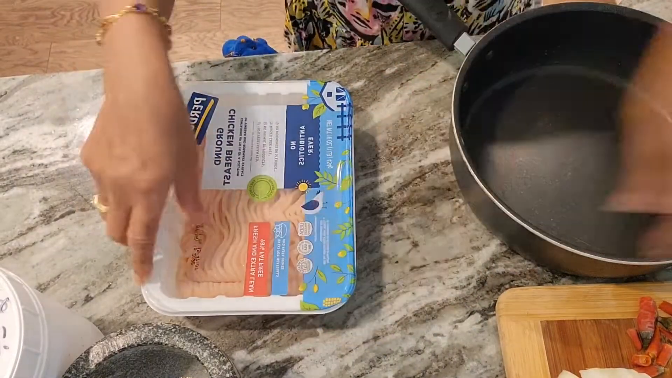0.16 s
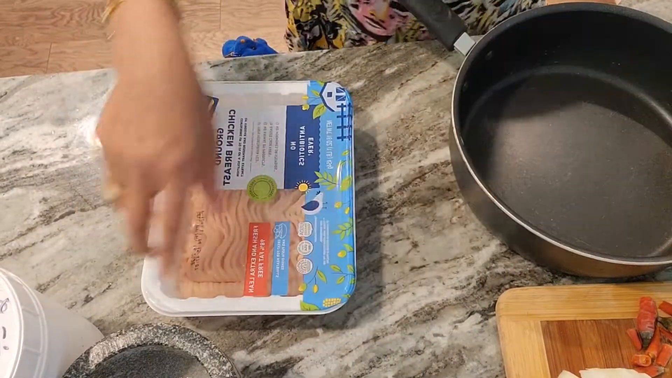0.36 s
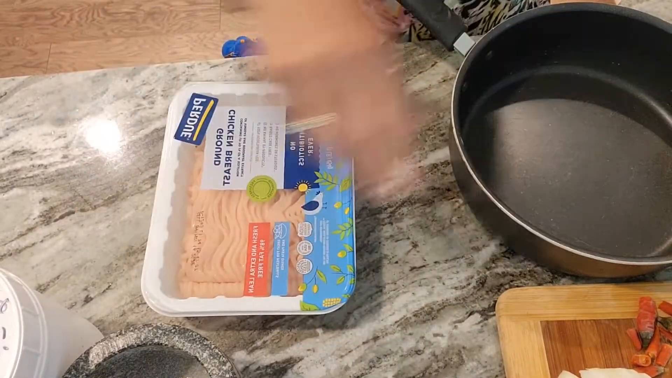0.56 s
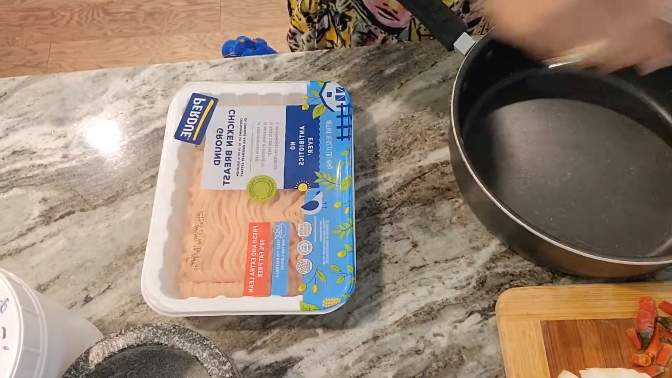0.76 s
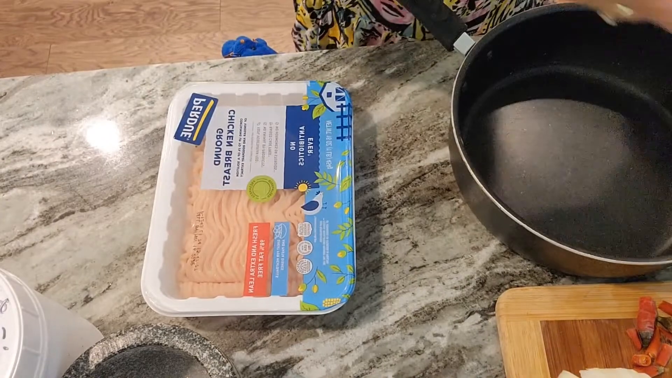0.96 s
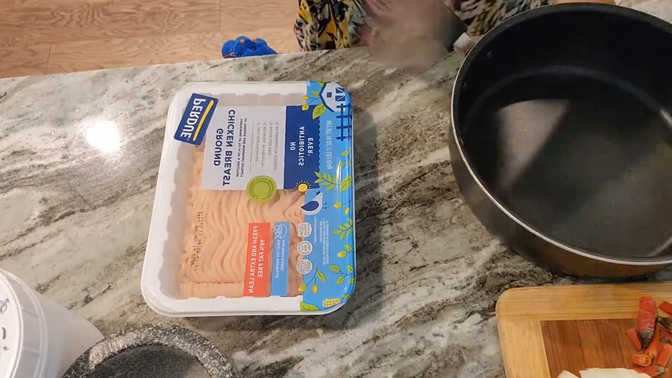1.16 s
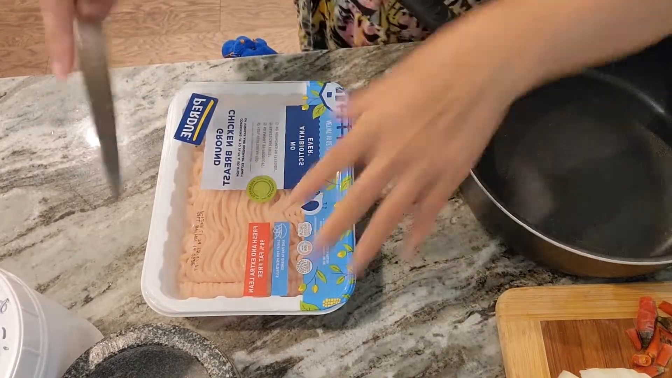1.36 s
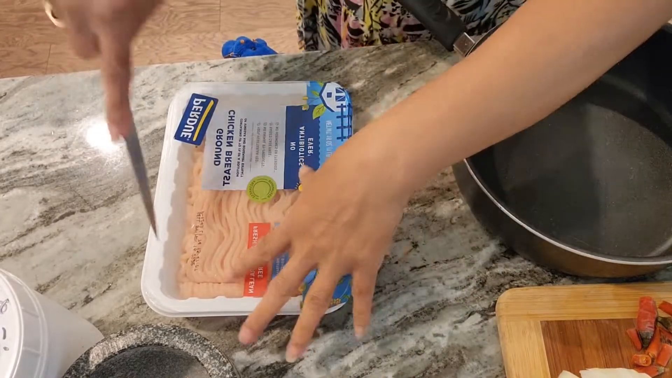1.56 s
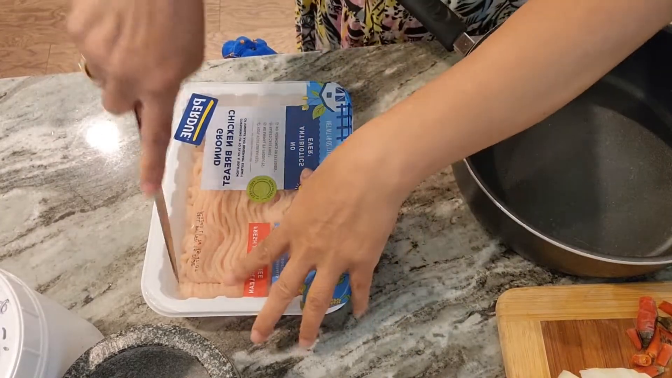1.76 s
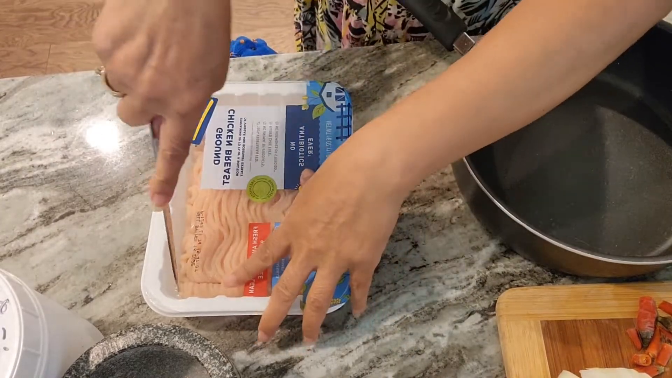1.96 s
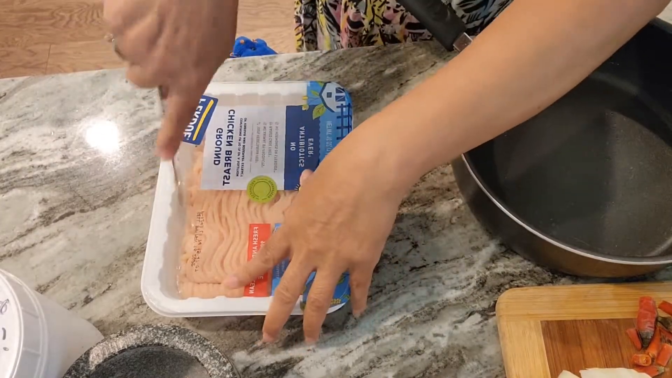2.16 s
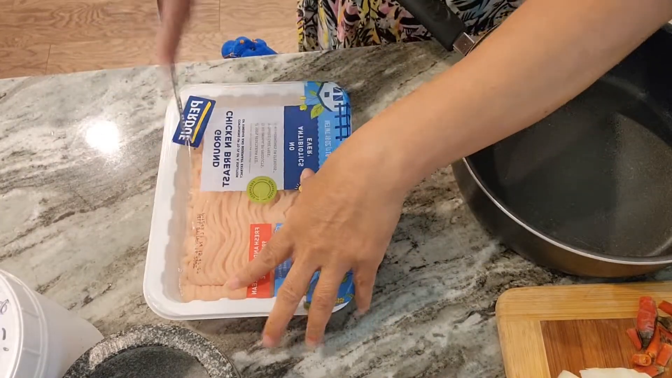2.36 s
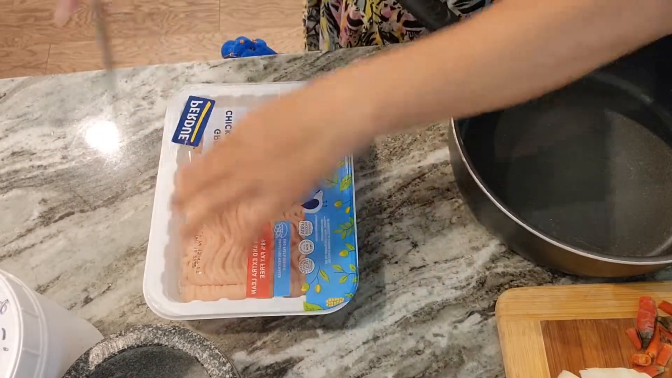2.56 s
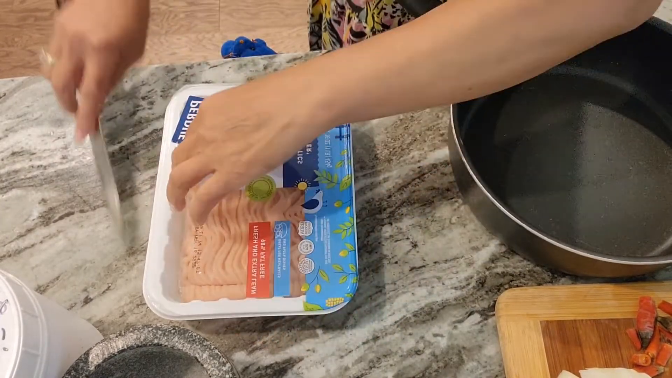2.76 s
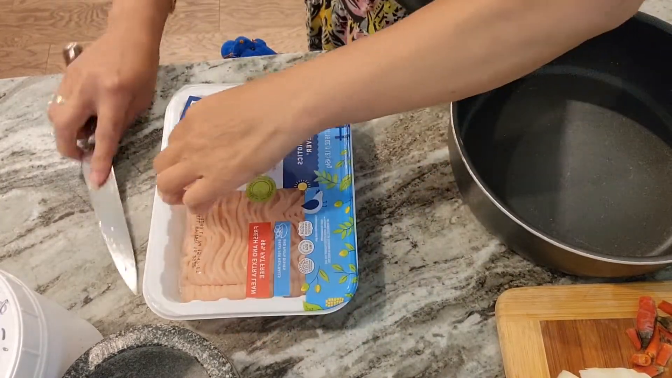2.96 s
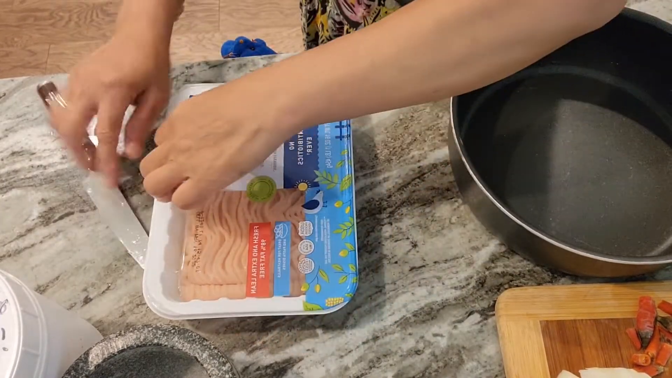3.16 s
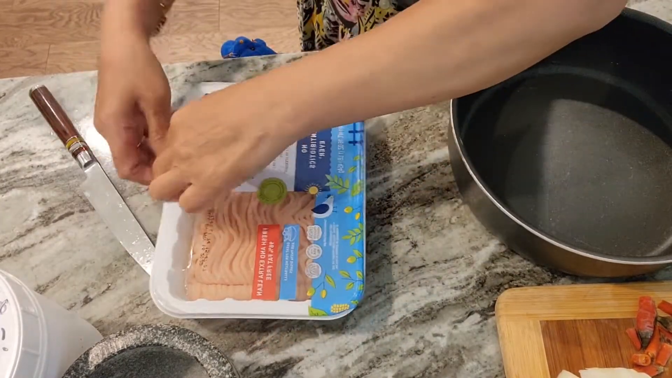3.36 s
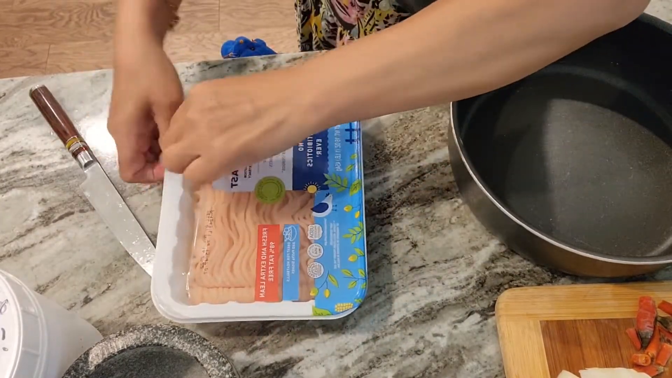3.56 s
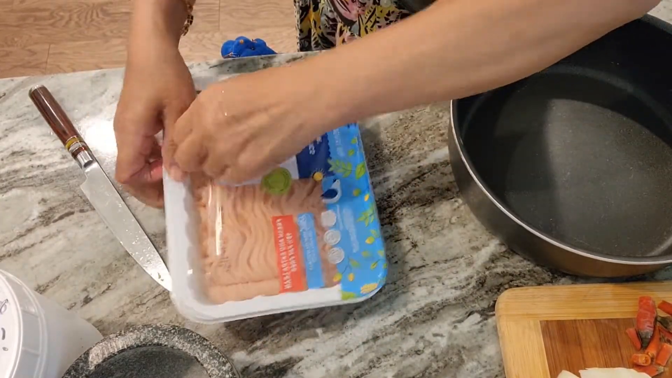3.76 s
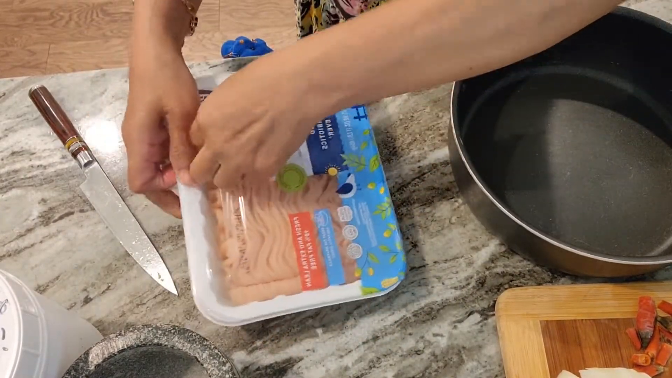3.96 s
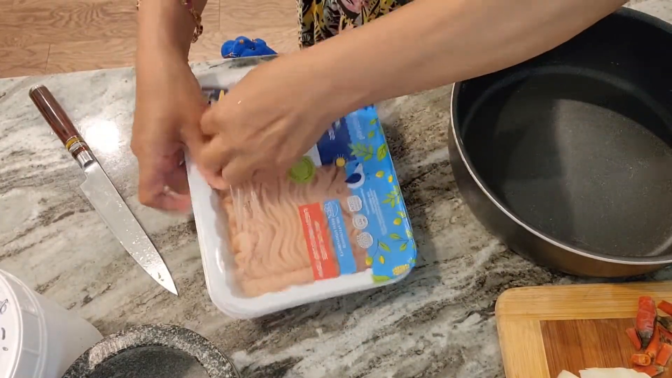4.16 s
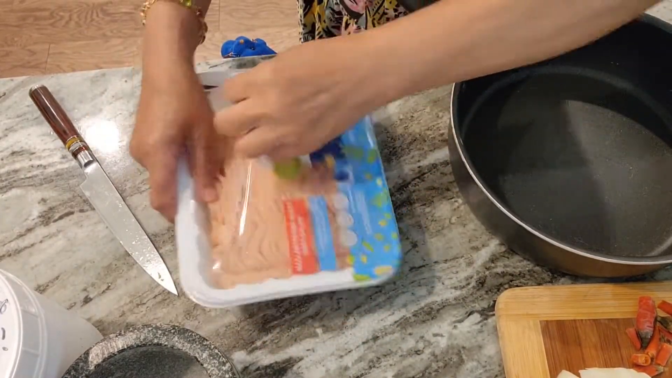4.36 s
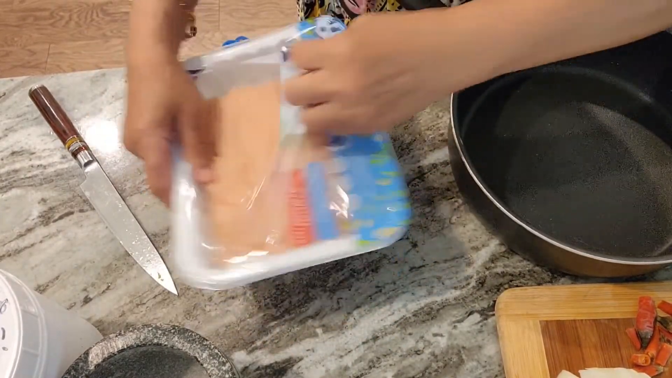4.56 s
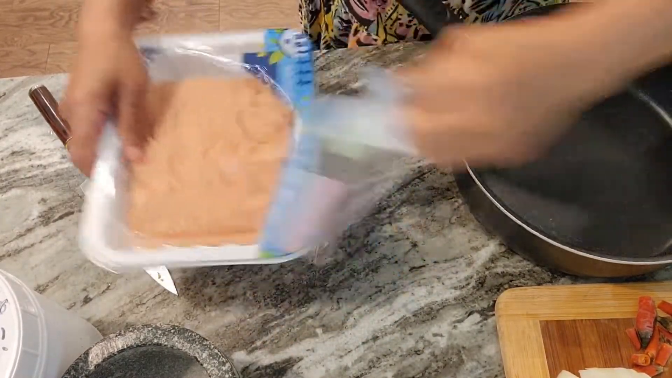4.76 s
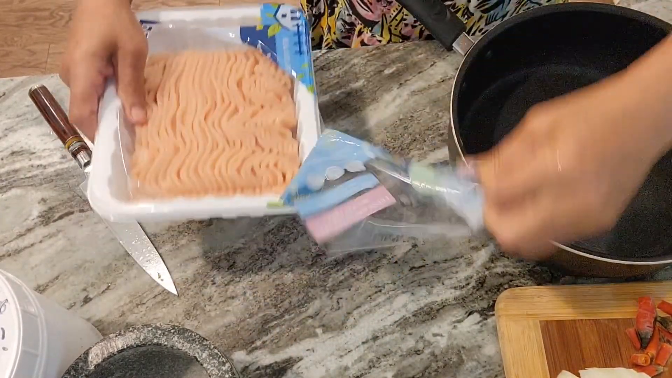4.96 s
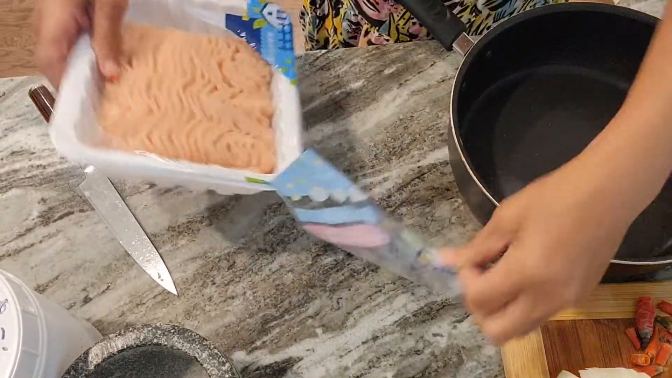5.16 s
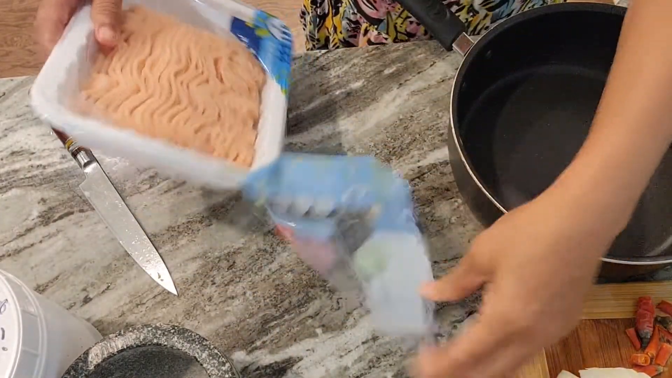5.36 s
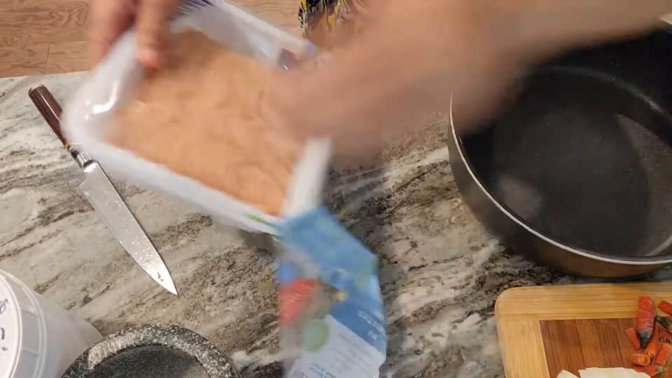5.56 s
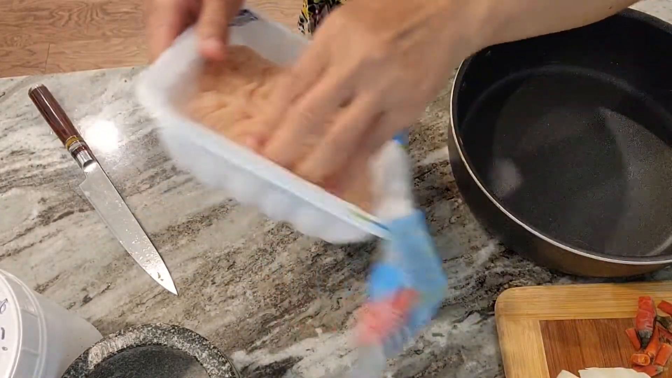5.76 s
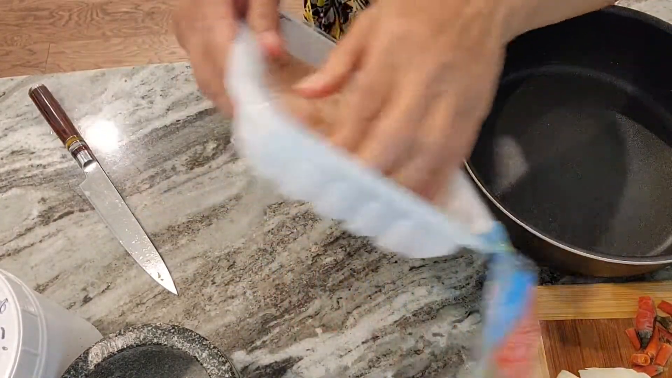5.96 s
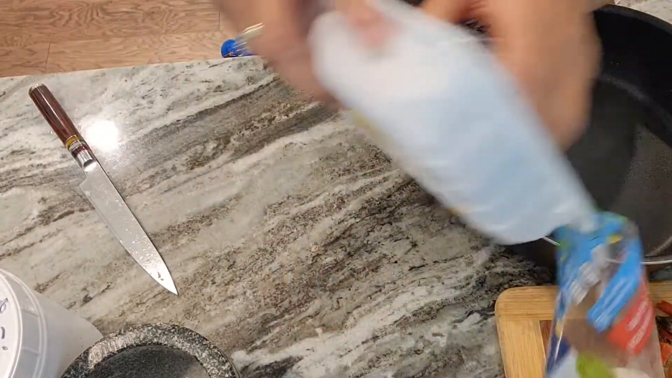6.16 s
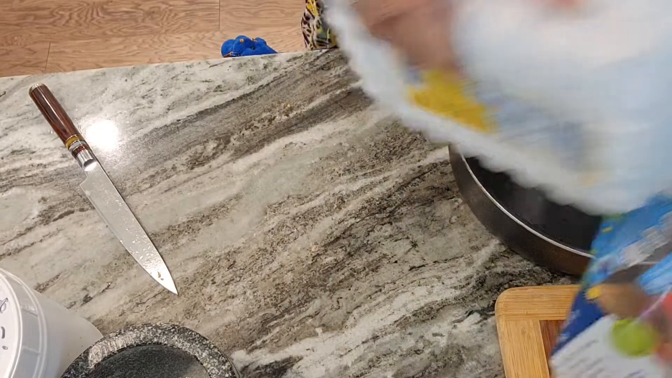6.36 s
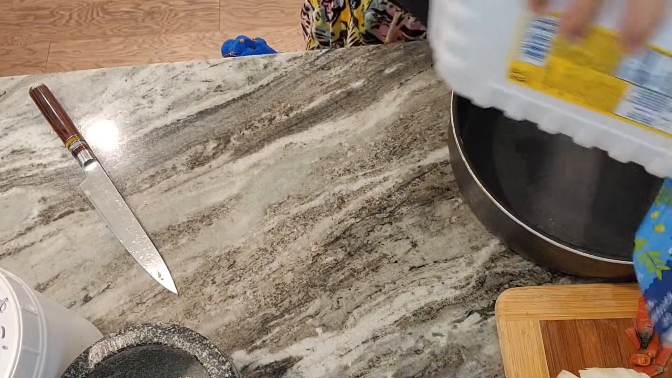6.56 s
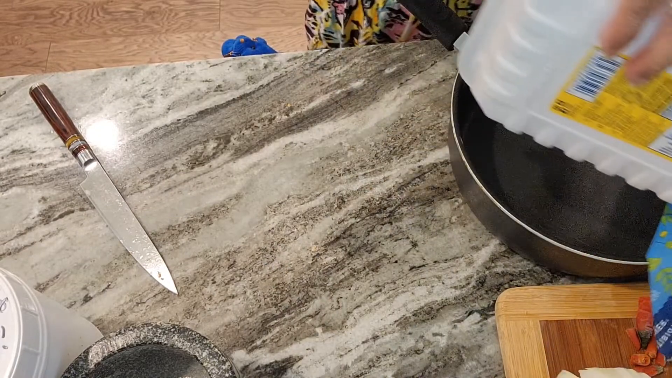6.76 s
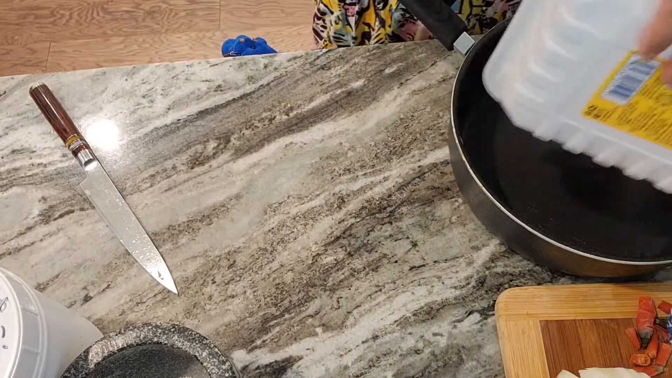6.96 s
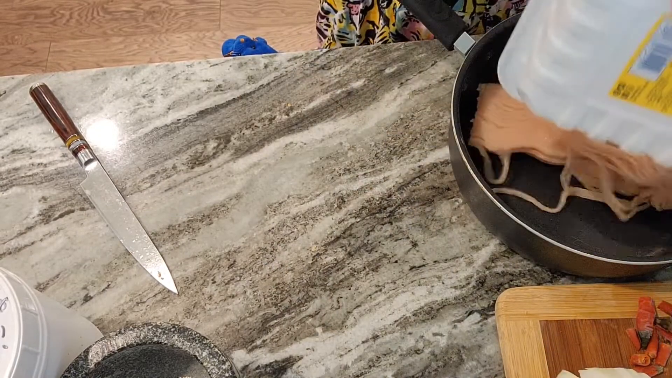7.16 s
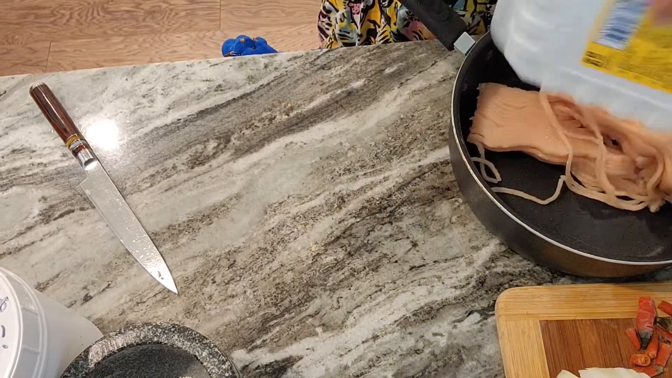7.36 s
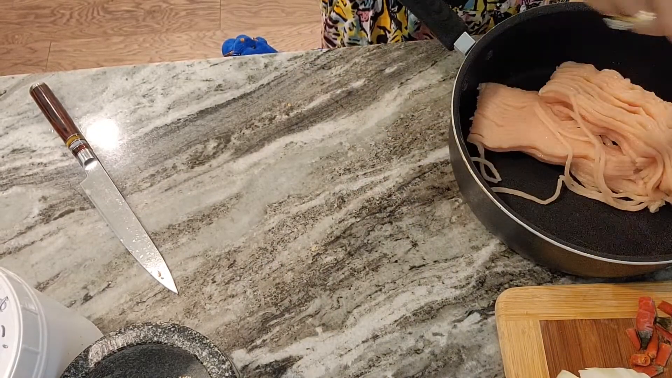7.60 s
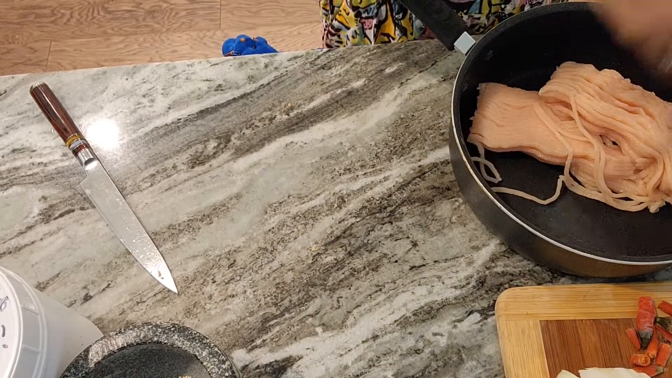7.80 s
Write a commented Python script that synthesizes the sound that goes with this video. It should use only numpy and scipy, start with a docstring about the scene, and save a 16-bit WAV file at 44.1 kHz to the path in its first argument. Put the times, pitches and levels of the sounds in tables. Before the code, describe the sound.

Close kitchen handling: sharp film pops, ringing steel laid on a stone counter, a crackling tear of plastic, light rustle and a dull pot knock.

```python
"""Plastic film snaps, crackles and tears as it is slit and ripped off a tray of minced meat.
A knife punctures the film and is laid on a stone counter with ringing, chattering steel.
The tray is then tipped over a pot, knocks on it, and the meat flops in.
Sudden pushes and noise bursts drive resonances; random tiny slips make the tearing, scraping and rustling.
It is heard close up in stereo, in a small, fairly live kitchen with hush, hum and a low boom behind."""
import sys
import numpy as np
from scipy import signal
from scipy.fft import rfft, irfft, next_fast_len
from scipy.io import wavfile
from scipy.ndimage import map_coordinates

SR = 44100
rng = np.random.default_rng(int(sys.argv[2]) if len(sys.argv) > 2 else 0)


def master_out(mix):
    """Clip the mix to full scale and print it as 16-bit PCM to the path in sys.argv[1]."""
    frames = np.transpose(np.atleast_2d(mix))
    ceiling = np.clip(frames, -1, 1)
    pcm = np.round(ceiling * 32767).astype(np.int16)
    wavfile.write(sys.argv[1], SR, pcm)


N = 345303
TOP_HZ = 16100  # upper band limit
TIME = np.arange(N) / SR  # time through the scene, in seconds
AGE = TIME[:SR // 2]  # time since one short event began, in seconds


def amp(db):
    """Turn decibels into gain."""
    return 10 ** (np.asarray(db) / 20)


def unit(x):
    """Scale a sound to an rms of 1."""
    return x / np.sqrt(np.mean(x ** 2) + 1e-20)


def along(points, hz):
    """Read a curve of (frequency [Hz], value) points on a log frequency axis."""
    f, v = np.transpose(points)
    return np.interp(np.log(hz + 1), np.log(f), v)


def swell(rows):
    """Gain over time through (time [s], level [dB]) points, -140 dB outside them."""
    s, db = np.transpose(rows)
    return amp(np.interp(TIME, s, db, left=-140, right=-140))


def stroke(start, attack, hold, release, db):
    """Gain over time of one movement: it builds, holds and dies away."""
    corners = start + np.cumsum(np.abs([0, attack, hold, release]))
    return amp(db) * np.interp(TIME, corners, [0, 1, 1, 0])


def filtered(x, response):
    """Shape the spectrum of x by a function of frequency."""
    n = x.shape[-1]
    m = next_fast_len(n + 8192)
    return irfft(rfft(x, m) * response(np.fft.rfftfreq(m, 1 / SR)), m)[..., :n]


def band(x, lo_hz, hi_hz, order=3):
    """Keep only the sound between two frequencies."""
    edges = [lo_hz, min(hi_hz, SR / 2 - 100)]
    return signal.sosfilt(signal.butter(order, edges, 'band', fs=SR, output='sos'), x)


def resonate(x, modes):
    """Let x drive resonances given as (frequency [Hz], width [Hz], level [dB])."""
    def response(f):
        total = 0
        for k, (c, w, db) in enumerate(modes):
            # neighbours have opposite signs
            total = total + (-1) ** k * amp(db) * 1j * f * w / (c * c - f * f + 1j * f * w)
        return total
    return filtered(x, response)


def brighten(x, db, corner_hz):
    """Raise or lower the treble above a corner frequency."""
    return filtered(x, lambda f: amp(db * f ** 4 / (f ** 4 + corner_hz ** 4)))


def add(track, s, x):
    """Mix x into the track from time s, in seconds."""
    i = round(s * SR)
    x = x[..., max(-i, 0):N - i]
    track[..., max(i, 0):max(i, 0) + x.shape[-1]] += x


def burst(t60):
    """A puff of noise that fades by 60 dB in t60 seconds."""
    return unit(rng.standard_normal(len(AGE)) * amp(-60 * AGE / t60))


def crackle(n, rate, spread_db):
    """Tiny slips at random moments, rate per second on average, a few much larger than the rest."""
    sizes = amp(spread_db * np.minimum(rng.exponential(size=n), 4)) * rng.choice([-1, 1], n)
    return unit(sizes * (rng.random(n) < rate / SR))


def pops(rows, release_t60, rough, width_hz, ring_db, thump_db, crack_db, sizzle_db):
    """A sudden push makes the tray ring and thump; the sheet cracks at a pitch set by the crease size."""
    out = np.zeros(N)
    for s, db, tray_hz, crease_hz, crack, sizzle in rows:
        push = unit(AGE == 0) + rough * burst(release_t60)
        ring = unit(band(resonate(push, [(tray_hz, width_hz, 0)]), 590, 3600))
        body = unit(unit(band(push, 620, 2200)) + amp(ring_db) * ring)
        crease = resonate(push, [(crease_hz, crease_hz / 3.5, 0)])
        sheet = amp(crack + crack_db) * unit(band(crease, 2300, 9500, order=2))
        fizz = amp(sizzle + sizzle_db) * unit(band(burst(.003), 8000, 17000, order=2))
        low = amp(thump_db) * unit(band(burst(0.022), 110, 480))
        # the level belongs to the peak of the body alone
        add(out, s + .001, amp(db) * (body + sheet + fizz + low) / np.abs(body).max())
    return out


def snaps():
    """Film snaps, and later light taps on the tray: one pitch curve sets the tray's ring."""
    # snaps and taps: (time [s], body peak level [dB], crease pitch [Hz], brightness [dB])
    snap_rows = [(0.18, -37.5, 3200, -45), (1.82, -55.5, 3200, -33), (1.997, -10.7, 7400, -19),
                 (2.135, -24, 4200, -11), (2.193, -14, 4800, -11), (2.304, -20, 3260, -34),
                 (2.502, -31, 3370, -20), (4.144, -11.5, 5100, -11), (4.152, -23, 4600, -12),
                 (4.322, -35, 4700, -12), (4.358, -29.5, 3730, -17), (4.365, -26.5, 5050, -13),
                 (4.43, -12, 3240, -28), (4.601, -21.5, 3350, -3), (4.64, -23.5, 4900, -8),
                 (4.654, -16, 5930, -5), (4.749, -24, 8110, -10), (4.767, -22.5, 5230, -9),
                 (4.783, -16.5, 3600, -8), (4.902, -23, 5220, -7), (5.118, -31, 4950, -24),
                 (5.376, -41, 3230, 5), (5.391, -29.5, 3570, -9), (5.488, -38.5, 3230, -25),
                 (5.603, -54, 3110, -33), (5.917, -40, 4500, -14), (6.526, -33.5, 5770, -20),
                 (7.62, -40, 5400, -8), (7.649, -42, 3100, -14), (7.74, -38, 3220, -16)]
    # pitch of the tray's ring: (time [s], pitch [Hz])
    ring_pitch = [(2.3, 1660), (4.15, 1180), (4.58, 1450), (4.77, 760), (5.39, 1500), (5.9, 900),
                  (6.5, 1100), (7.6, 830)]
    crack_share = .33  # dB of crack per dB of brightness: a brighter one gains most in the top octave
    rows = []
    for s, db, crease_hz, bright_db in snap_rows:
        tray_hz = np.interp(s, *np.transpose(ring_pitch))
        rows.append((s, db, tray_hz, crease_hz, crack_share * bright_db, bright_db))
    return pops(rows, release_t60=.005, rough=.35, width_hz=420,
                ring_db=3, thump_db=-24, crack_db=4, sizzle_db=1.5)


def ticks():
    """Slack film flips a crease with a thin tick; its creases are all of about one size."""
    # ticks: (time [s], body peak level [dB])
    tick_rows = [(1.407, -68), (4.497, -43), (5.248, -55), (5.28, -52), (6.153, -60), (6.662, -54),
                 (6.692, -52), (6.8, -59), (6.866, -61), (6.92, -51), (7.059, -58), (7.397, -58)]
    tray_hz, typical_crease_hz = 850, 3900
    scatter = .15  # spread of the crease pitch, as a share of it
    crease_hz = typical_crease_hz * np.exp(scatter * rng.standard_normal(len(tick_rows)))
    rows = [(s, db, tray_hz, hz, 7, -13) for (s, db), hz in zip(tick_rows, crease_hz)]
    return pops(rows, release_t60=.005, rough=.35, width_hz=420,
                ring_db=3, thump_db=-21, crack_db=4, sizzle_db=1.5)


def buckles():
    """A wall of the tray gives way under the fingers and rings dully at its own pitch."""
    # buckles: (time [s], body peak level [dB], wall pitch [Hz])
    buckle_rows = [(3.469, -31, 1000), (3.549, -29.5, 1300), (3.622, -39, 1320), (3.653, -32, 1650),
                   (3.696, -32, 1340), (3.804, -36.5, 1290), (3.875, -41, 1260), (3.996, -31, 802),
                   (4.041, -34, 958), (4.382, -17.5, 1000), (4.434, -18, 662)]
    crease_hz = 3800
    rows = [(s, db, wall_hz, crease_hz, -14, -26) for s, db, wall_hz in buckle_rows]
    return pops(rows, release_t60=0.005, rough=0.52, width_hz=89,
                ring_db=-2.5, thump_db=-13, crack_db=-0.5, sizzle_db=-9.5)


def tears():
    """Each short tear or rub of the film is a run of slips that swells and fades."""
    # tears and rubs: (start [s], length [s], level [dB], treble [dB])
    tear_rows = [(-0.04, 0.14, -50.5, -12), (0.142, 0.066, -50.5, -10.5), (0.364, 0.027, -48.5, -6),
                 (1.65, .037, -68, -20), (1.845, .05, -68, -1), (2.193, 0.041, -15.2, -1),
                 (2.378, 0.16, -48.5, -9), (3.738, 0.11, -53, -5), (4.416, 0.022, -25, 3.5),
                 (4.658, 0.042, -25.5, 15.5), (4.737, 0.14, -26.5, 7), (5.062, 0.096, -38, 5),
                 (5.362, 0.096, -44, 1.5), (5.969, 0.03, -54.5, 16), (6.23, .13, -57.5, -6),
                 (7.119, 0.071, -47, -15.5), (7.478, .052, -59, 9)]
    # spectrum of tearing film: (frequency [Hz], level [dB per Hz])
    film = [(30, -32), (150, -19.5), (450, -25.5), (800, -2), (1200, -6.5), (1600, 0.5), (2400, -7.5),
            (4800, -7), (7000, -15.5), (10000, -24), (15500, -25.5)]
    # the tray's low answer is damped while it lies on the counter, freer once lifted
    lying_db, lifted_db, lift_s = -21, -13, 4.2
    out = np.zeros(N)
    for s, length, db, treble_db in tear_rows:
        slips = crackle(len(AGE), rate=2200, spread_db=3.5)
        sheet = unit(brighten(filtered(slips, lambda f: amp(along(film, f))), treble_db, 4500))
        tray = amp(lying_db if s < lift_s else lifted_db) * unit(band(slips, 240, 700))
        arch = np.sqrt(np.abs(np.sin(np.pi * AGE / length))) * (AGE < length)
        add(out, s, amp(db) * arch * (sheet + tray))
    return out


def pull():
    """The lid comes away in one pull: the seal unzips along the rim and drives the whole tray like a drum."""
    # the pull: (start [s], attack [s], hold [s], release [s], level [dB])
    movement = (4.776, .04, .03, .056, -17.4)
    # resonances of the tray under the film: (frequency [Hz], width [Hz], level [dB])
    tray_modes = [(560, 93, -8), (786, 110, -3), (1310, 420, -11), (1810, 250, -8), (2703, 2200, -15.5),
                  (5390, 970, -13), (7930, 1600, -20.5)]
    slips = crackle(N, rate=1100, spread_db=4.5)
    low = amp(-14) * unit(band(slips, 220, 500))
    fizz = amp(-22.5) * unit(band(slips, 7000, 21000, order=2))
    rip = unit(resonate(slips, tray_modes)) + low + fizz
    return stroke(*movement) * unit(rip)


def tiny_tones(pitch_hz, cycles, count=700):
    """Small ticks at random moments, each a short dying tone with its own pitch."""
    start = rng.random(count) * (N - 300)
    pitch = rng.standard_normal(count)
    size = rng.exponential(size=count)
    n = np.arange(300)  # samples in one grain
    turns = np.minimum(pitch_hz * np.exp(.45 * pitch), TOP_HZ)[:, None] * n / SR
    loudness = amp(4.5 * np.minimum(size, 3))[:, None]
    grains = loudness * np.sin(2 * np.pi * turns) * np.exp(-turns / cycles)
    # sum all grains at their places
    return unit(np.bincount((start.astype(int)[:, None] + n).ravel(), grains.ravel(), N))


def rustle():
    """Loose film ticks in uneven clumps, along with small ticks that each have their own pitch."""
    # loudness of the rustle: (time [s], level [dB])
    loudness = [(3.4, -65), (3.95, -78), (4.3, -54), (4.55, -59), (5.0, -52), (5.3, -69), (5.55, -65),
                (5.8, -80), (6.2, -71), (7.0, -70.5), (7.5, -75), (7.83, -62.5)]
    # spectrum of loose film: (frequency [Hz], level [dB per Hz])
    loose_film = [(350, -49), (600, -7.5), (758, 0.5), (1180, -5), (1450, -7), (2310, -6.5), (3730, -9),
                  (6830, -20.5), (16000, -28.5)]
    clumps = amp(2.5 * unit(band(rng.standard_normal(N), 8, 35, order=2)))
    slips = clumps * crackle(N, rate=1400, spread_db=3.5)
    crinkle = filtered(slips, lambda f: amp(along(loose_film, f)))
    pitched_ticks = 0.96 * tiny_tones(pitch_hz=4243, cycles=2.9)
    return swell(loudness) * (unit(brighten(crinkle, 5.4, 9000)) + pitched_ticks)


def ringing(modes, ratio, wander):
    """Modes struck at new strengths, with a slightly wavering pitch."""
    hz, db, t60 = np.transpose(modes)[:, :, None]
    drift = np.cumsum(rng.standard_normal((len(modes), len(AGE))), axis=1) * wander / SR
    size = amp(db + rng.normal(0, 2.5, db.shape) - 60 * AGE / t60)
    turns = hz * ratio * (AGE + drift) + rng.random(db.shape)
    return np.sum(size * np.sin(2 * np.pi * turns), axis=0)


def steel(rows, modes, rasp_db, sizzle_db, corner_hz):
    """Metal chatters as it lands; each row scales the pitch of its ring."""
    out = np.zeros(N)
    for s, db, bright_db, chatter, ratio in rows:
        ring = ringing(modes, ratio, wander=.05)
        contact = burst(chatter) * np.abs(rng.standard_normal(len(AGE)))
        rasp = unit(band(contact, 3660, 7850, order=2))
        rasp = rasp + .5 * unit(band(contact, 1050, 2200))
        rasp = rasp + amp(sizzle_db) * unit(band(contact, 8700, 15000))
        hit = brighten(unit(ring) + amp(rasp_db) * rasp, bright_db, corner_hz)
        add(out, s, amp(db) * hit / np.abs(hit).max())
    return out


def knife():
    """The knife is laid on the stone and slides a little, rattling over the grain."""
    # steel touches stone: (time [s], peak level [dB], brightness [dB], chatter t60 [s], pitch ratio)
    touches = [(2.8855, -17.5, 4, 0.02, 0.925), (2.959, -30.5, 5, 0.058, 1.04),
               (3.105, -36, 8.5, 0.019, 0.97), (3.1335, -15, -20, 0.012, .93), (3.1855, -10, 6, 0.012, 1.1),
               (3.2, -8.7, 14, 0.033, 0.88), (3.26, -35, 2, .04, 1.3), (3.341, -27, 0, 0.039, 1.7)]
    # ring of the knife, before the pitch ratio: (frequency [Hz], level [dB], t60 [s])
    knife_modes = [(1090, -40.5, 0.16), (1340, -8.5, 0.25), (3330, 0.5, 0.12), (3500, -25, 0.32),
                   (4339, -15, 0.18), (4950, -6, 0.23), (5047, -1.5, 0.097), (5835, -7.5, .12),
                   (7260, -3.5, .12), (8370, -11.5, 0.3), (13460, -18, 0.22)]
    # the blade slides to rest: (start [s], attack [s], hold [s], release [s], level [dB])
    slide = (3.19, .125, .045, .045, -39.5)
    # spectrum of steel on stone: (frequency [Hz], level [dB per Hz])
    stone = [(240, -15.5), (400, -7), (852, -25.5), (1230, -8.5), (1930, -18), (2120, -27), (3210, -12.5),
             (8110, -16), (10700, -26.5), (13700, -17), (16000, -24)]
    slips = crackle(N, rate=900, spread_db=5)
    scrape = unit(filtered(slips, lambda f: amp(along(stone, f))))
    sing = unit(resonate(scrape, [(hz, 45, db) for hz, db, _ in knife_modes]))
    laid = steel(touches, knife_modes, rasp_db=1, sizzle_db=-6, corner_hz=7000)
    return laid + stroke(*slide) * unit(brighten(scrape, 3, 10000) + .6 * sing)


def clinks():
    """Small metal things strike and ring as the knife is fetched; ratio 1.24 is another, higher-pitched piece."""
    # clinks: (time [s], peak level [dB], brightness [dB], chatter t60 [s], pitch ratio)
    clink_rows = [(0.499, -35, -2, 0.044, 1.0), (0.505, -34, -10, 0.12, 1.0), (0.532, -38, -12, 0.17, 1.0),
                  (0.63, -54.5, 20, 0.3, 1.0), (0.712, -43, 13, 0.043, 1.24),
                  (0.738, -45.5, 12, 0.086, 1.24)]
    # ring of the metal, before the pitch ratio: (frequency [Hz], level [dB], t60 [s])
    metal_modes = [(1168, -11, 0.2), (1803, -6, 0.1), (2482, -14, 0.14), (3101, 5, 0.11), (3230, 2, 0.042),
                   (4100, -26, 0.12), (4791, -6, 0.11), (5190, -6, 0.074), (6720, -13, 0.12),
                   (10000, -24, 0.43), (12300, -16, 0.16)]
    return steel(clink_rows, metal_modes, rasp_db=-4, sizzle_db=-6, corner_hz=5500)


def knocks():
    """Tray and meat hit the pot: each blow is a push with a short rub; the load shifts the pot's pitch."""
    # blows: (time [s], peak level [dB], brightness [dB], pitch ratio, rub t60 [s])
    blows = [(6.566, -22.5, -4, 0.806, 0.0042), (7.137, -31, -12, 1.26, .02),
             (7.152, -35.5, -4, 0.84, 0.047), (7.7605, -13.5, 6, 0.994, 0.022)]
    # damped pot with the tray against it, before the pitch ratio: (frequency [Hz], width [Hz], level [dB])
    pot_modes = [(358, 99, -13.5), (733, 106, 2.5), (984, 82, 2), (1330, 133, -9), (3340, 1070, -16.5),
                 (5300, 1370, -22.5), (9500, 3600, -34)]
    out = np.zeros(N)
    for s, db, bright_db, ratio, contact in blows:
        push = unit(AGE == 0) + .35 * burst(contact)
        loaded = [(hz * ratio, width, level) for hz, width, level in pot_modes]
        ring = brighten(resonate(push, loaded), bright_db, 2700)
        add(out, s, amp(db) * ring / np.abs(ring).max())
    return out


def bumps():
    """Soft, heavy contacts shake the counter: soft ones miss its high resonances, brief ones its lowest."""
    # bumps: (time [s], peak level [dB], dull above [Hz], t60 [s])
    bump_rows = [(0.506, -50.5, 1200, 0.2), (1.998, -49, 150, 0.15), (2.221, -43, 260, .2),
                 (2.309, -30.5, 340, 0.045), (2.508, -43, 330, 0.07), (2.884, -47, 300, 0.25),
                 (3.132, -28.7, 900, 0.42), (4.428, -39, 330, 0.06), (4.792, -35.5, 160, 0.21),
                 (7.15, -55, 220, 0.15), (7.763, -44.5, 240, 0.061)]
    # resonances of the counter: (frequency [Hz], width [Hz], level [dB])
    counter_modes = [(95, 75, 2), (240, 130, 0), (680, 400, -7)]
    lowest_hz = 38  # reached by a bump with a t60 of one second
    out = np.zeros(N)
    for s, db, dull_hz, t60 in bump_rows:
        low_hz = min(lowest_hz / np.sqrt(t60), .8 * dull_hz)
        thud = band(resonate(burst(t60), counter_modes), low_hz, dull_hz, order=3)
        add(out, s, amp(db) * thud / np.abs(thud).max())
    return out


def place(x, lag_ms):
    """A near source reaches one microphone port before the other; a positive lag delays the left."""
    half = lag_ms * SR / 2000  # half the lag, in samples
    return np.array([map_coordinates(x, [np.arange(N) + side * half], order=5) for side in (-1, 1)])


def diffuse(pair):
    """Sound from all sides: alike in the bass, unrelated in the treble."""
    def mix(f):
        turn = np.arccos(np.clip(0.83 * np.sinc(f / 1400), -1, 1)) / 2
        return np.array([np.cos(turn), np.sin(turn)])
    mid, side = filtered(pair, mix)
    return np.array([mid + side, mid - side])


def kitchen(x, close_db, close_t60, early_db, early_t60, count=30):
    """The counter answers at once, cupboards soon, the walls slowly."""
    # reverberation of the walls: (frequency [Hz], t60 [s])
    wall_decay = [(150, 0.64), (500, 0.51), (1500, 0.49), (4500, 0.56), (8000, .46), (15000, 0.38)]
    out, size = np.zeros((2, N)), N // count + 1
    for i in range(0, N, size):
        # each block of sound gets a fresh random tail
        hz, t, z = signal.stft(rng.standard_normal((2, len(AGE))), SR, nperseg=256)
        fade = amp(-60 * t / along(wall_decay, hz)[:, None])
        walls = signal.istft(z * fade, SR, nperseg=256)[1][:, :len(AGE)]
        early = amp(early_db - 60 * AGE / early_t60)
        close = amp(close_db - 60 * AGE / close_t60)
        tail = walls * (1 + early + close)
        echo = signal.fftconvolve(x[None, i:i + size], tail / np.linalg.norm(tail[0]), axes=1)
        add(out, i / SR + .001, echo)
    return brighten(diffuse(out), -1, 9800)


def background():
    """Shaped noise makes the room hush, unsteady tones the appliance hum, narrow noise a boom that swells twice."""
    # spectrum of the quiet room: (frequency [Hz], level [dB per Hz])
    hush_shape = [(15, -64), (25, -38.5), (49, -9), (111, -7.5), (145, -11), (256, -15), (335, -16),
                  (384, -17), (439, -14), (624, -20), (1440, -29.5), (3820, -32.5), (5430, -34.5),
                  (16000, -58)]
    # appliance hum: (frequency [Hz], level [dB])
    hum_tones = [(142, -71.5), (334, -78.5)]
    # low booms: (start [s], attack [s], hold [s], release [s], level [dB])
    boom_rows = [(5.8, .2, .08, .11, -56), (6.33, .28, .1, .33, -59.5)]
    noise = rng.standard_normal((2, N))
    hush = unit(diffuse(filtered(noise, lambda f: amp(along(hush_shape, f)))))
    hum = np.zeros(N)
    for hz, db in hum_tones:
        waver = unit(resonate(rng.standard_normal(N), [(hz, 8, 0)]))
        hum += amp(db) * unit(np.sin(2 * np.pi * hz * TIME) + .5 * waver)
    boom = sum(stroke(*row) for row in boom_rows) * unit(band(rng.standard_normal(N), 68, 81))
    return amp(-68.5) * hush + hum + boom


def scene():
    """Tray, pot, knife and metal, each at its own place in the kitchen."""
    # the tray travels from the counter to the pot: (time [s], lag of the left channel [ms])
    tray_path = [(0, -.14), (4.2, -.16), (4.8, -.09), (5.3, 0), (6.5, .16), (7.8, .2)]
    tray = amp(4.5) * (snaps() + ticks()) + amp(-2) * buckles()
    tray = tray + amp(-4) * tears() + amp(-3) * pull() + rustle() + bumps()
    blade, pot, metal = knife(), knocks(), clinks()
    direct = place(tray, np.interp(TIME, *np.transpose(tray_path))) + place(metal, 0.313)
    # the knife is louder on the left, the pot on the right
    direct += place(blade, -.2) * amp([[1.6], [-1.6]]) + place(pot, 0.14) * amp([[-1.3], [1.3]])
    room = kitchen(tray + blade + metal + amp(-5) * pot,
                   close_db=16.5, close_t60=0.0096, early_db=5.5, early_t60=0.17)
    return direct + amp(1) * room + background()


def record(dry):
    """A very steep low-pass removes what lies above the band limit."""
    return filtered(dry, lambda f: 1 / (1 + (f / TOP_HZ) ** 120))


dry = scene()
out = record(dry)
master_out(out)
```